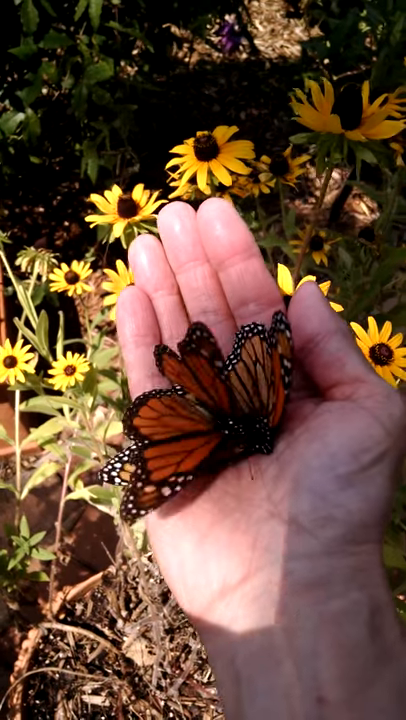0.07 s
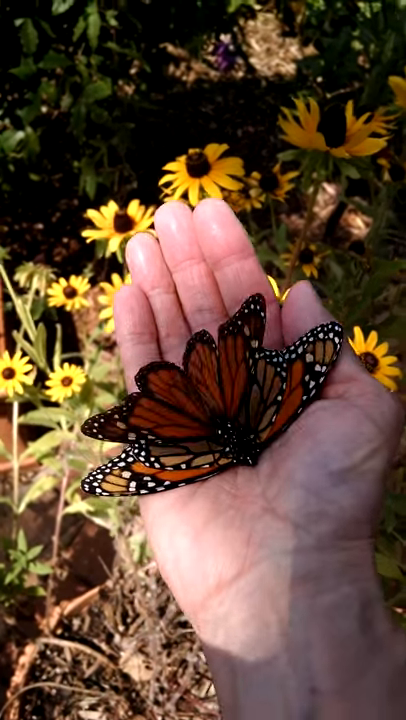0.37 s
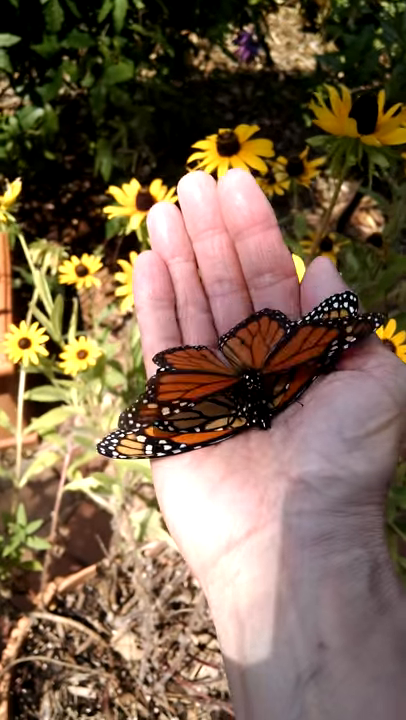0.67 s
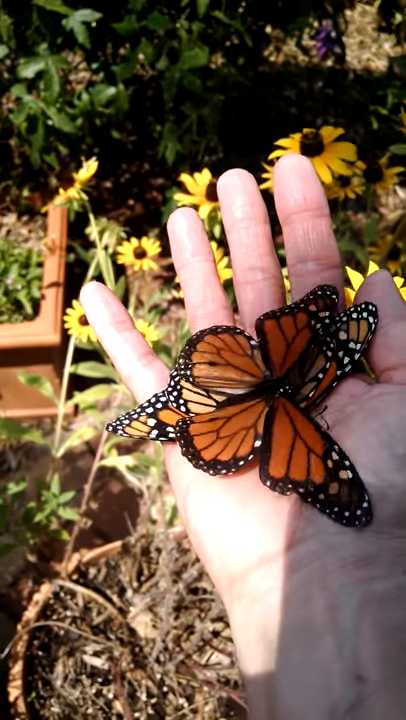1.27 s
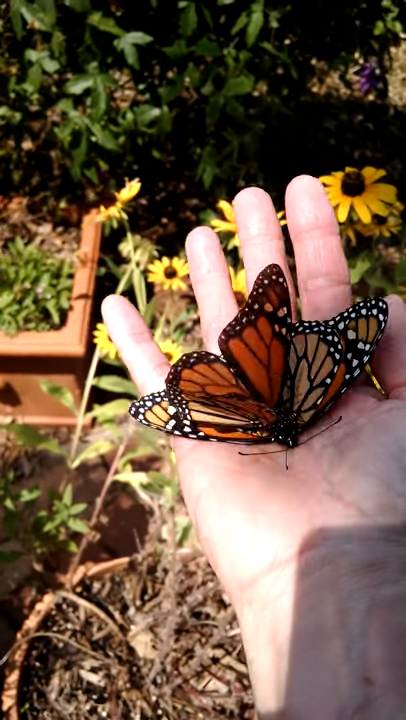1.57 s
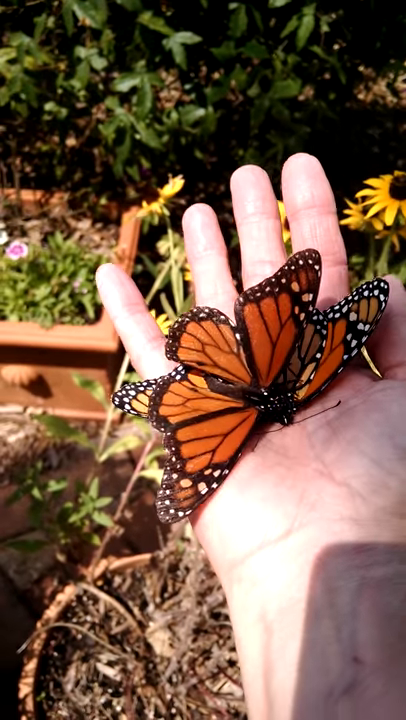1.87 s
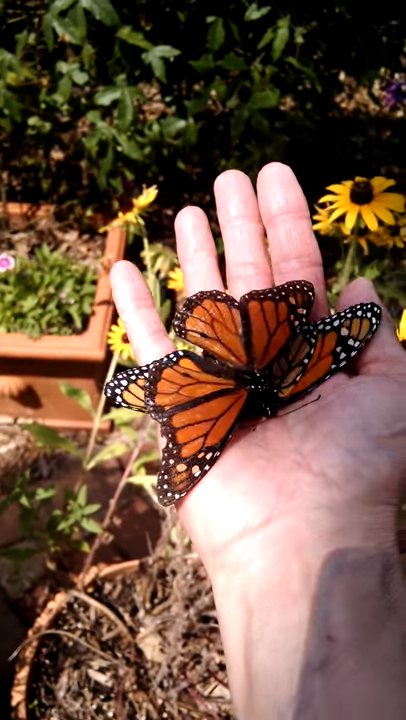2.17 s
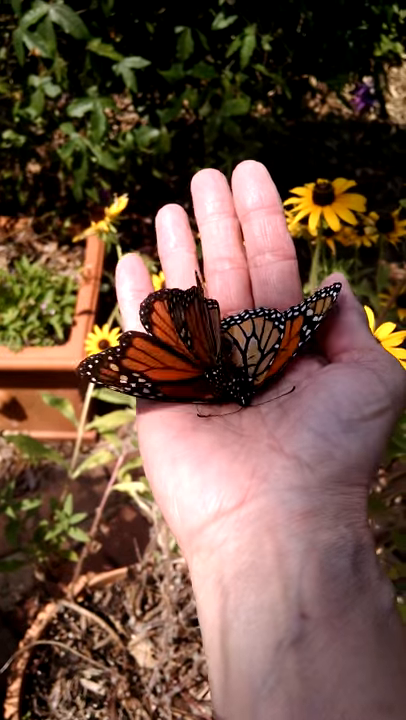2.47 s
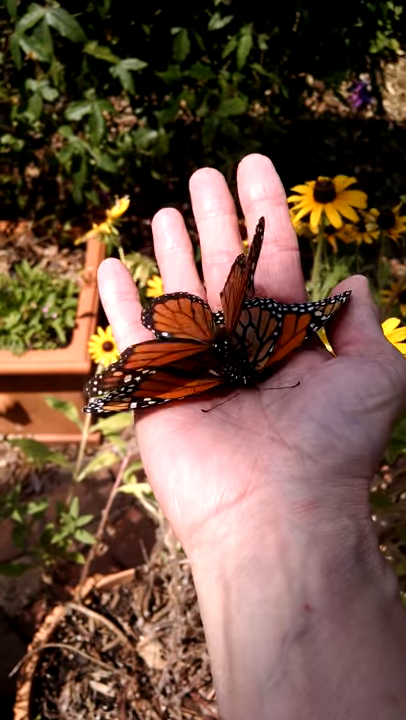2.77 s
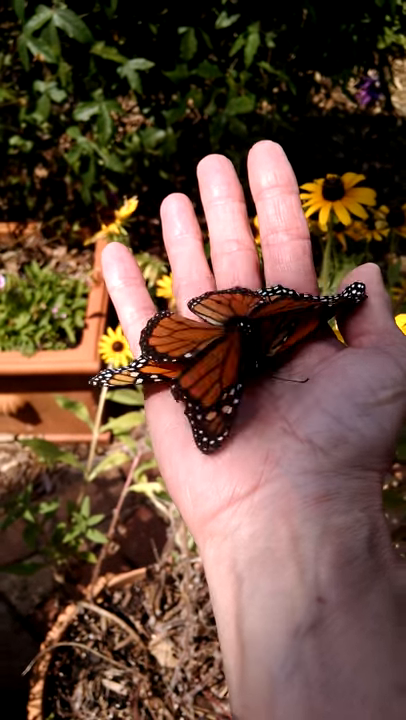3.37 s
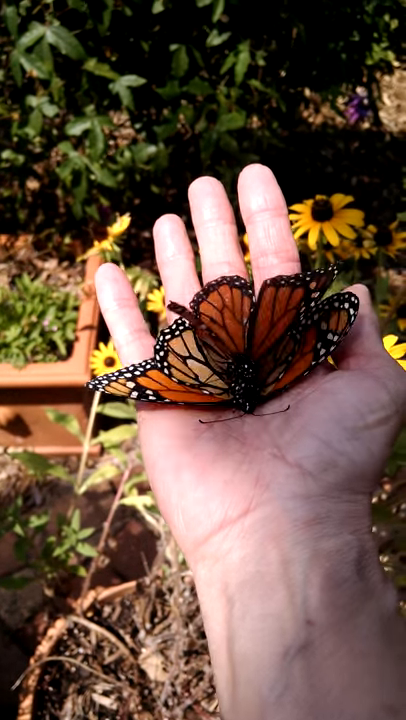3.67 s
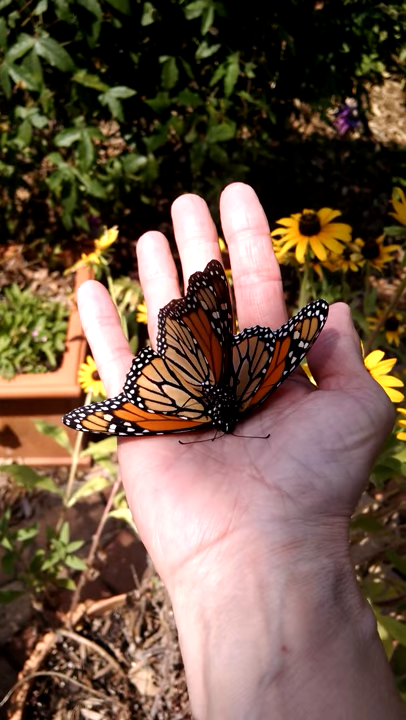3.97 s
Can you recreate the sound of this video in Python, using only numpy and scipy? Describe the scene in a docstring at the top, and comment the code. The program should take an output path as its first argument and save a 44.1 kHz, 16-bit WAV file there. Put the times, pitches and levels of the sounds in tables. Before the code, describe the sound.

Close, papery rustles and small taps come from butterflies fluttering on a palm in a garden, over steady hiss and distant rumble. The flutters grow sparse, then a cicada's pulsing buzz rises as the microphone rumbles briefly from handling.

```python
"""Two butterflies beat their wings on an open hand in a garden. Friction of wing on wing and on skin
gives grainy noise; the wings tick as they meet and pat the palm. Behind them lie a far rumble, a faint
machine hum and steady hiss; a low handling rumble swells near the end as the hand moves. In the last
second a cicada swells in slowing pulses, its buzz coloured by narrow ringing peaks. The camera widens
its stereo by feeding each microphone, delayed and inverted, into the other side."""
import sys
import numpy as np
from scipy.fft import rfft, irfft, next_fast_len
from scipy.io import wavfile
from scipy.ndimage import map_coordinates

SR = 44100
rng = np.random.default_rng(int(sys.argv[2]) if len(sys.argv) > 2 else 0)


def output_pcm(signal):
    """Save a mono or channel-first signal as 16-bit PCM at the path in sys.argv[1].

    Samples are clipped to [-1, 1] before scaling.
    """
    pcm = np.clip(np.atleast_2d(signal).T, -1, 1) * 32767
    wavfile.write(sys.argv[1], SR, np.round(pcm).astype(np.int16))


N = 176400
t = np.arange(N) / SR
CENTRE = np.array([[1], [0]])  # sources are (mid, side) pairs; this one is all mid


def amp(db):
    """Amplitude ratio of a level in decibels."""
    return 10 ** (np.asarray(db) / 20)

def unit(x):
    """Normalisation to rms 1."""
    return x / np.sqrt(np.mean(x ** 2) + 1e-20)

def along(points, hz):
    """Interpolation of (f/Hz, value) points on a logarithmic frequency axis."""
    f, values = np.transpose(points)
    return np.interp(np.log(hz + 1), np.log(f + 1), values)

def colour(points):
    """Magnitude response through (f/Hz, level/dB) points."""
    return lambda hz: amp(along(points, hz))

def wobble(rate):
    """Smooth random modulation: a spline through rate Gaussian knots a second."""
    return map_coordinates(rng.standard_normal(int(N * rate / SR) + 4), [t * rate])

def filtered(x, response):
    """Linear filtering: the spectrum of x times a frequency response."""
    size = next_fast_len(N + SR // 4)
    return irfft(rfft(x, size) * response(np.fft.rfftfreq(size, 1 / SR)), size)[..., :N]

def noise(gain, correlation):
    """Partly coherent noise, rms 1 per ear: the mid-to-side ratio sets the left-right correlation."""
    def response(hz):
        angle = np.arccos(np.clip(along(correlation, hz), -1, 1)) / 2
        return gain(hz) * np.array([np.cos(angle), np.sin(angle)])
    return unit(filtered(rng.standard_normal((2, N)), response)) / np.sqrt(2)


# Spectra of the background noise: f/Hz, relative level/dB
RUMBLE_SPECTRUM = [(20, -11), (40, -2), (80, 1), (120, 1), (170, -4.5), (240, -11), (390, -9.5), (490, -15),
                   (680, -11), (1200, -19.5), (1600, -21.5), (2100, -31.5), (4000, -45)]
HISS_SPECTRUM = [(500, -1.5), (1900, -2.5), (2450, -3), (2750, 5.5), (3200, 4), (4400, 1.5), (5200, 3.5),
                 (6800, 1.5), (7900, 5.5), (8700, -4), (9400, 0.5), (11500, -1.5), (13000, 0.5),
                 (14000, 1.5), (15500, -3)]
# Left-right correlation of the far field: f/Hz, coefficient
FAR_CORRELATION = [(60, .7), (290, .55), (700, .73), (1400, .55), (2200, .1), (15000, 0)]
# Partials of a far machine: f/Hz, level/dB
HUM_PARTIALS = [(117, -60.5), (401, -62), (418, -68), (576, -69.5), (690, -67), (882, -69.5), (1255, -71)]

def garden(rumble_db=-46.5, swing_db=.5, hiss_db=-48.5, waver_hz=6):
    """Superposition of broadband rumble and hiss with a hum of narrow, randomly modulated partials."""
    rumble = amp(rumble_db + swing_db * wobble(4.8)) * noise(colour(RUMBLE_SPECTRUM), FAR_CORRELATION)
    hiss = amp(hiss_db) * noise(colour(HISS_SPECTRUM), FAR_CORRELATION)
    hum = np.zeros(N)
    for hz, db in HUM_PARTIALS:
        phase = 2 * np.pi * hz * t
        hum += amp(db) * (wobble(waver_hz) * np.sin(phase) + wobble(waver_hz) * np.cos(phase))
    return rumble + hiss + hum * CENTRE


# Envelope of the handling rumble: t/s, level/dB
HANDLING_ENVELOPE = [(0, -70), (1.5, -69), (3.1, -58), (3.6, -46.5), (4, -56.5)]
# Its spectrum: f/Hz, relative level/dB
HANDLING_SPECTRUM = [(20, -9), (42, 9), (70, -1.5), (150, -17), (400, -27)]

def handling_rumble():
    """Amplitude-modulated noise: a low handling rumble swells near the end as the hand moves."""
    envelope = amp(np.interp(t, *np.transpose(HANDLING_ENVELOPE)))
    return envelope * noise(colour(HANDLING_SPECTRUM), correlation=[(40, .4)])


# Spectra of dry wing hiss, wing scrape and rubbing on skin: f/Hz, relative level/dB
DRY_SPECTRUM = [(400, -49), (1500, -8.5), (3500, -10.5), (6000, -6.5), (8500, -0.5), (11000, 1),
                (13000, 0.5), (14500, 5.5), (16000, 1.5)]
SCRAPE_SPECTRUM = [(300, -56), (900, -19), (1600, -37), (2400, -2.5), (3900, -2), (5300, -4.5),
                   (8000, -14.5), (15000, -12)]
SKIN_SPECTRUM = [(100, -15), (300, -4), (700, 0), (1200, -1), (2000, -10), (4000, -28)]
# Left-right correlation of the wings: f/Hz, coefficient
WING_CORRELATION = [(500, .6), (1700, -.1), (4000, .1), (8000, -.15), (15000, 0)]
# Strokes: peak t/s, half length/s, dry level/dB, scrape level/dB, skin level/dB
WING_STROKES = [(0.028, .014, -44.5, -50, -59), (0.087, 0.023, -49, -53.5, -57),
                (0.369, .006, -57, -60, -47.5), (0.374, 0.034, -40, -47.5, -62),
                (0.672, 0.026, -38, -39, -50.5), (0.791, 0.019, -63, -45, -50.5),
                (0.861, 0.035, -41.5, -48.5, -52), (1.019, 0.027, -44, -47.5, -53),
                (1.104, 0.026, -46, -55, -74), (1.152, 0.022, -43, -41, -45),
                (1.247, 0.0085, -42.5, -61, -57), (1.314, 0.027, -43, -52, -67),
                (1.4, 0.029, -53, -56, -55), (3.505, 0.022, -42.5, -44, -69), (3.787, 0.029, -45, -61, -65)]

def wing_strokes(steepness=1.17, grain_hz=810, grain_db=1.5, crackle_db=-4):
    """Sliding friction: noise swells and fades with each stroke, roughened by the changing grip."""
    envelopes = np.zeros((3, N))
    for peak_s, half_s, *levels_db in WING_STROKES:
        offset = np.clip(steepness * (t - peak_s) / half_s, -20, 20)
        envelopes += amp(levels_db)[:, None] / np.cosh(offset)
    grip = unit(amp(grain_db * wobble(grain_hz)))
    friction = sum(envelope * noise(colour(spectrum), WING_CORRELATION)
                   for envelope, spectrum in zip(envelopes, (DRY_SPECTRUM, SCRAPE_SPECTRUM, SKIN_SPECTRUM)))
    return grip * friction + amp(crackle_db) * envelopes[0] * scale_crackle()

def scale_crackle(catches_per_s=600, spread_db=4):
    """Shot noise: wing scales catch at random instants, in impulses of uneven size; rms 1 per ear."""
    catches = (rng.random(N) < catches_per_s / SR) * rng.choice([-1, 1], (2, N))
    sizes = amp(spread_db * np.clip(rng.standard_normal(N), -2, 2))
    return unit(filtered(catches * sizes, colour(DRY_SPECTRUM))) / np.sqrt(2)


# Ticks: t/s, relative peak level/dB, decay time/s, level of the dull part re the bright part/dB
WING_TICKS = [(0.0748, -31, .001, -16), (0.2655, -27, 0.00046, -8), (0.2707, -33.5, .0005, -8),
              (0.3555, -19, 0.0018, -11), (0.3916, -34, .001, -9), (.6485, -37, .0015, 5),
              (0.656, -36, 0.0014, 6.5), (.677, -38, 0.0018, 7), (.68, -37, .0006, 6),
              (.843, -20, 0.0015, -6), (.85, -28, .001, -2), (0.8532, -33, 0.0011, 5.5),
              (0.8716, -32, .0008, -5), (0.883, -31.5, 0.0011, -6), (1.1026, -24, 0.0036, -9.5),
              (1.2293, -34, .0006, -9), (1.31, -34, .0015, -4), (1.3336, -17.5, 0.0009, -27),
              (1.3372, -30, .0008, -18), (1.368, -38.5, .0015, 4), (1.3803, -25, 0.00099, -9),
              (1.677, -36, 0.0028, -7), (1.741, -36.5, 0.0011, -17), (2.086, -36, 0.0034, -8),
              (2.456, -34.5, .0025, -6), (2.516, -36, .0015, -10), (2.933, -37, 0.0025, -14),
              (3.1887, -26.5, 0.0009, -13)]

def wing_ticks(rise_s=.0006, burst_db=-1, bright_click_db=8, dull_click_db=2):
    """Impulsive excitation: stiff wing edges snap past each other, a click in a burst with no ringing."""
    envelopes, impulses = np.zeros((2, N)), np.zeros((2, N))
    for peak_s, db, decay_s, dull_db in WING_TICKS:
        sizes = amp([db, db + dull_db])
        falloff = np.maximum((peak_s - t) / rise_s, (t - peak_s) / decay_s)
        envelopes += sizes[:, None] * np.exp(-np.minimum(falloff, 20))
        impulses[:, round(peak_s * SR)] += sizes
    quadrature = np.array([[1], [1j]]) / np.sqrt(2)  # mid and side 90 degrees apart
    parts = (colour(DRY_SPECTRUM), bright_click_db), (colour(SCRAPE_SPECTRUM), dull_click_db)
    ticks = np.zeros((2, N))
    for envelope, impulse, (gain, click_db) in zip(envelopes, impulses, parts):
        ticks += amp(burst_db) * envelope * noise(gain, WING_CORRELATION)
        ticks += amp(click_db) * filtered(impulse, lambda hz: quadrature * gain(hz))
    return ticks


# Pats on the palm: peak t/s, half length/s, f/Hz, frequency spread/Hz, level/dB
PALM_PATS = [(.3648, .005, 345, 70, -40), (.793, .021, 950, 110, -51)]

def palm_pats():
    """Soft impact of a wing on the palm: a hollow tone of wandering pitch under a Gaussian envelope."""
    pats = np.zeros(N)
    for peak_s, half_s, hz, spread_hz, db in PALM_PATS:
        envelope = amp(db) * np.exp(-((t - peak_s) / half_s) ** 2)
        phase = 2 * np.pi * np.cumsum(hz + spread_hz * wobble(2 * spread_hz)) / SR
        pats += envelope * np.sqrt(2) * np.sin(phase)
    return pats * CENTRE


# Spectra of the cicada's pulsed rasp and even sizzle: f/Hz, relative level/dB
RASP_SPECTRUM = [(1900, -24), (2500, 7), (2850, -1), (3300, 1.5), (4100, -5), (4800, 5.5), (5400, -3),
                 (6400, -10), (7700, 2), (9000, -11), (14000, -11.5)]
SIZZLE_SPECTRUM = [(1800, -11), (3000, -6.5), (4500, 1), (6000, 2.5), (7700, 4), (9200, -5.5), (10500, 0.5),
                   (14000, -3), (15500, -8)]
# Narrow ringing peaks that colour its buzz: f/Hz, width/Hz, level re the underlying spectrum/dB
RINGING_PEAKS = [(2630, 60, 5), (3050, 14, 5), (3247, 25, 6), (3292, 18, 7), (3487, 16, 9), (3550, 16, 3),
                 (3990, 16, 5), (4123, 18, 8), (4468, 16, 5), (4566, 14, 4), (4724, 16, 8), (6303, 16, 8),
                 (6732, 14, 5), (6975, 16, 8), (7612, 18, 6)]
# Its left-right correlation: f/Hz, coefficient
CICADA_CORRELATION = [(2500, .1), (3300, .75), (4700, .6), (5500, .1), (6500, .35), (9000, 0), (15000, 0)]
# Its singing effort: t/s, relative level/dB
CICADA_EFFORT = [(2.7, -41), (3.0, -18), (3.18, -11), (3.3, -5.5), (3.5, -3), (3.75, 0), (4.0, 1.5)]

def cicada(rasp_db=-37, rasp_growth=1.27, sizzle_db=-42.5, click_share=.45, sharpness=2.2):
    """Source and filter: narrow peaks colour clicks and noise; the pulsed rasp outgrows the sizzle."""
    def ringing(f):
        peaks = sum(amp(db) ** 2 / (1 + ((f - hz) / width) ** 2) ** 2 for hz, width, db in RINGING_PEAKS)
        return np.sqrt(1 + peaks)
    effort_db = np.interp(t, *np.transpose(CICADA_EFFORT), left=-80)
    pulse_at_s, period_s, slowing_s = 3.322, .0341, .001037  # one pulse, its period, growth per pulse
    period = np.sqrt(np.maximum(period_s ** 2 + 2 * slowing_s * (t - pulse_at_s), 0))
    phase = 2 * np.pi * (period - period_s) / slowing_s
    pulses = np.exp(sharpness * (np.cos(phase) - 1) / 2)
    rasp_gain = lambda f: colour(RASP_SPECTRUM)(f) * ringing(f)
    rasp = np.sqrt(click_share) * tymbal_buzz(rasp_gain)
    rasp += np.sqrt(1 - click_share) * noise(rasp_gain, CICADA_CORRELATION)
    sizzle = noise(lambda f: colour(SIZZLE_SPECTRUM)(f) * ringing(f), CICADA_CORRELATION)
    return amp(rasp_db + rasp_growth * effort_db) * pulses * rasp + amp(sizzle_db + effort_db) * sizzle

def tymbal_buzz(gain, click_hz=432, wander=.03, wander_hz=30):
    """Buckling: the ribs of the cicada's drum give way in a nearly periodic click train; rms 1 per ear."""
    count = np.cumsum(click_hz * (1 + wander * wobble(wander_hz))) / SR
    clicks = np.diff(np.floor(count), prepend=0)
    low_cut_hz = RASP_SPECTRUM[0][0]
    return unit(filtered(clicks, lambda hz: gain(hz) * (hz > low_cut_hz))) * CENTRE


def scene():
    """Superposition of all sources; the sum and difference of mid and side give left and right."""
    mid, side = wing_strokes() + wing_ticks() + palm_pats() + cicada() + garden() + handling_rumble()
    return np.array([mid + side, mid - side])


# Cross-feed between the camera's channels: f/Hz, amplitude ratio
CROSSFEED_RATIO = [(500, 0), (1200, .6), (2000, .65), (2550, .95), (3900, .85), (5200, .55), (6500, .22),
                   (9000, .27), (11600, .38), (15000, .42)]
# Imbalance of its microphones: f/Hz, level of left re right/dB
MIC_IMBALANCE = [(60, -4.5), (640, -4.5), (1400, 1), (4000, 0.5), (8000, 1.6), (12000, 0.5)]

def record(dry, delay_s=.00039, top_hz=15600):
    """Interference with a delayed, inverted cross-feed widens the stereo; imbalance and low-pass follow."""
    share = lambda hz: np.clip(along(CROSSFEED_RATIO, hz), 0, 1)
    crossfeed = filtered(dry[::-1], lambda hz: share(hz) * np.exp(-2j * np.pi * hz * delay_s))
    balance = lambda hz: amp(np.array([[.5], [-.5]]) * along(MIC_IMBALANCE, hz))
    return filtered(dry - crossfeed, lambda hz: balance(hz) / np.sqrt(1 + share(hz) ** 2) * (hz < top_hz))


dry = scene()
out = record(dry)
output_pcm(out)
```